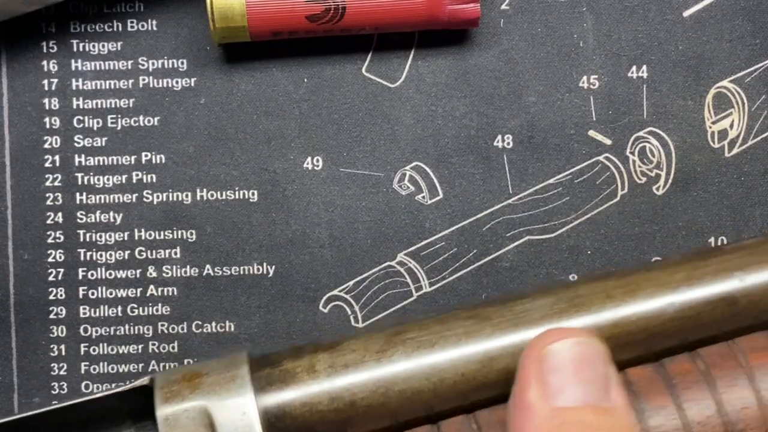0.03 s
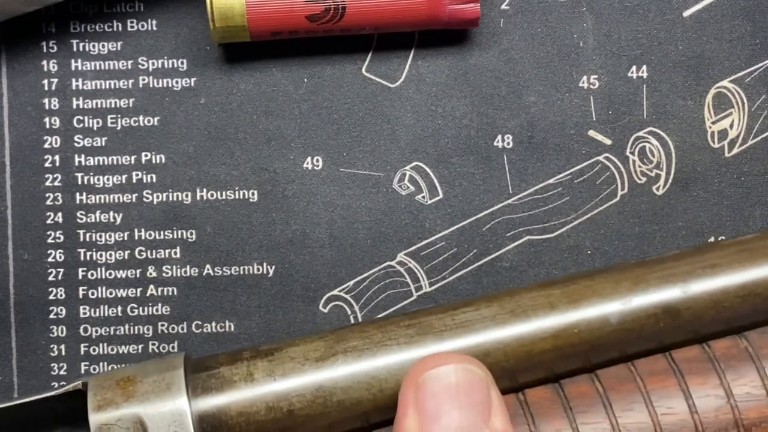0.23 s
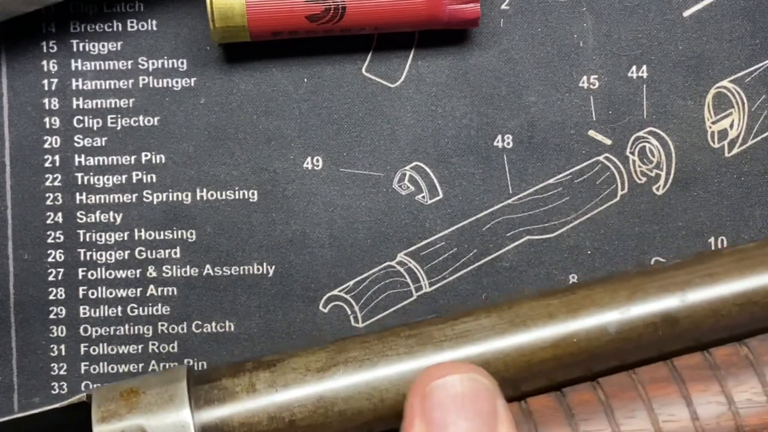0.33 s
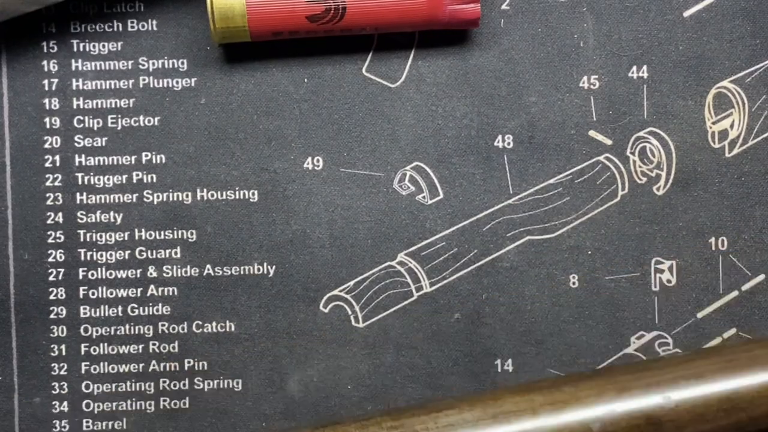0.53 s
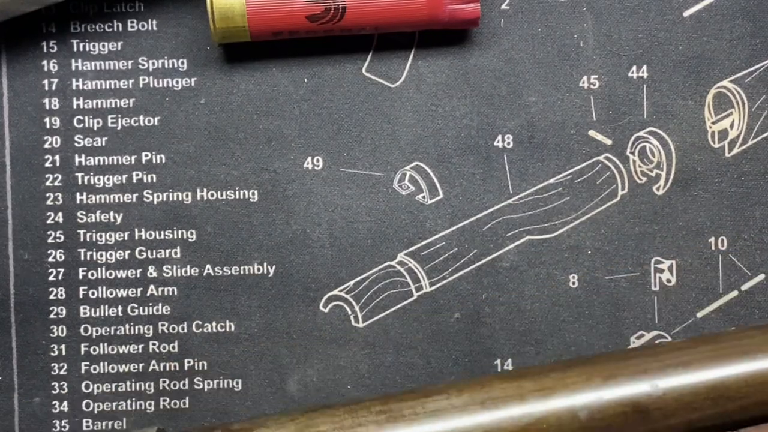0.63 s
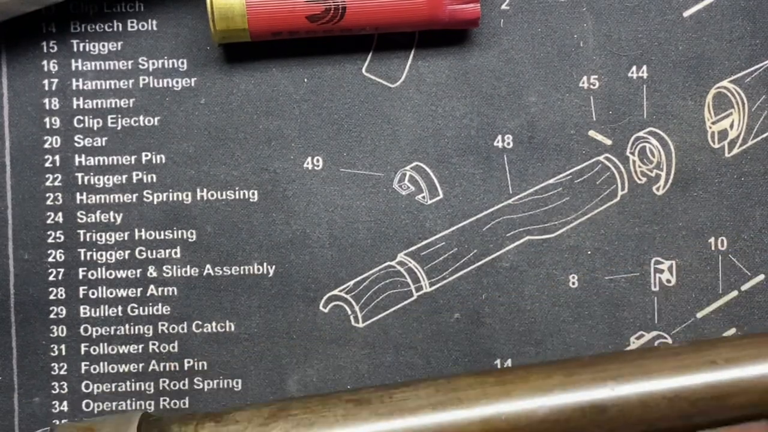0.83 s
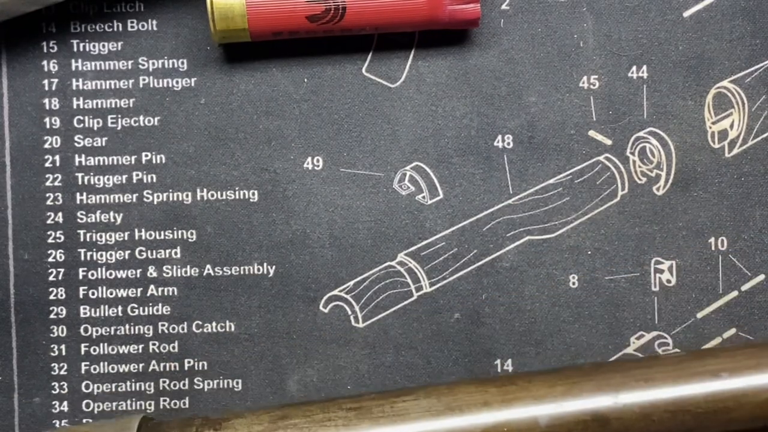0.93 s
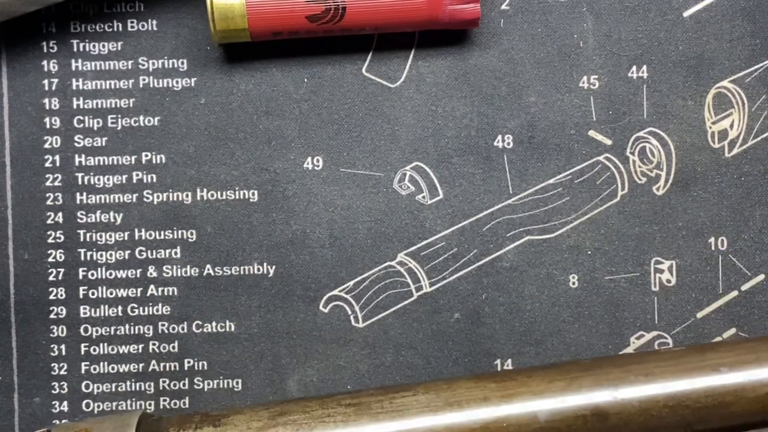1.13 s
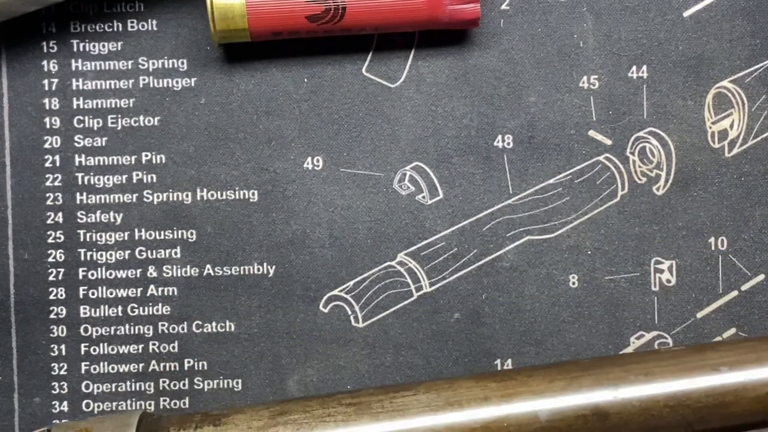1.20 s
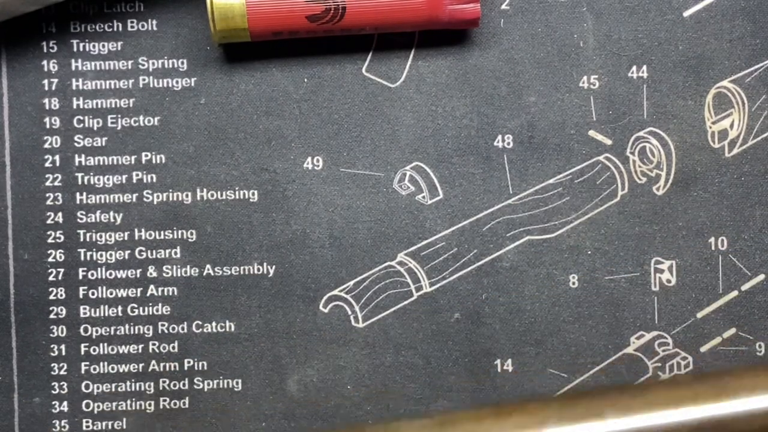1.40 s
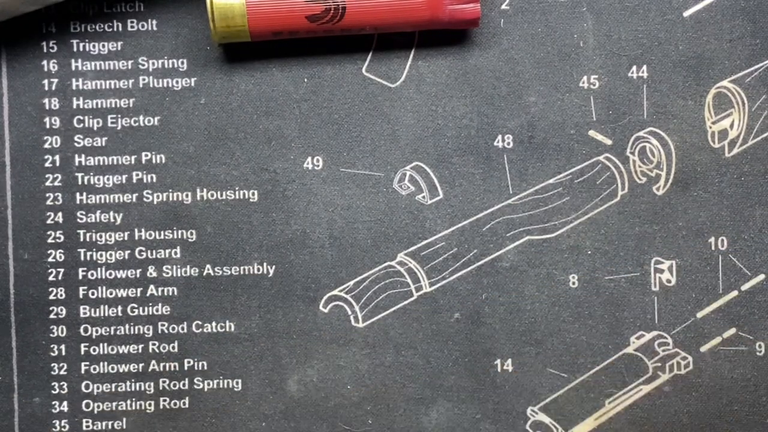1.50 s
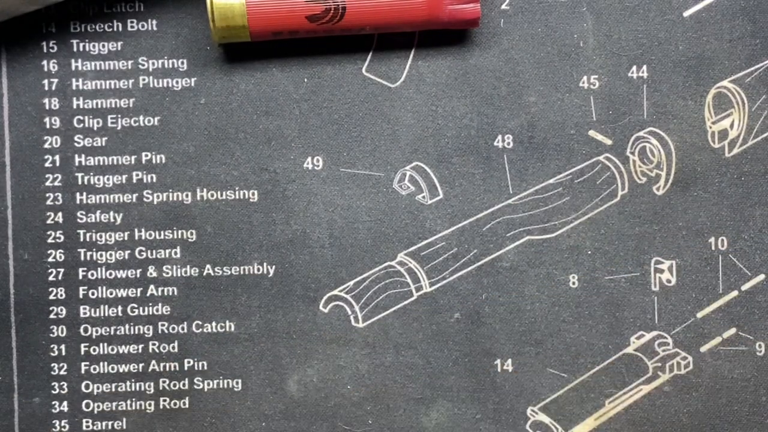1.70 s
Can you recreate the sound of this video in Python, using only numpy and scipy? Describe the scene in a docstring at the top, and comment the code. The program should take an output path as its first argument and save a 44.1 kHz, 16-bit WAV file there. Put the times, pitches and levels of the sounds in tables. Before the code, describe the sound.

Close to the microphone in a small room, a heavy gun's metal parts clack in two quick clusters as it is lifted. The padded bench thumps, then booms softly while hands faintly rub and tick on the gun.

```python
"""A heavy steel shotgun is picked up from a padded workbench, close to the microphone, in a small room.
At first it rings faintly from an earlier touch. Its parts clack near 0.11 s and again near 0.4 s,
each time in a quick run of metal contacts that scrape, clank and ring the steel. The second run ends
in a dull thump through the bench at 0.48 s. Then the bench booms softly as the weight shifts,
and hands rub and tick on the gun over a faint hiss, rumble and hum."""
import sys
import numpy as np
from scipy import signal
from scipy.fft import rfft, irfft
from scipy.io import wavfile

SR = 44100
rng = np.random.default_rng(int(sys.argv[2]) if len(sys.argv) > 2 else 0)


def output_pcm(signal):
    """Save a mono or channel-first signal as 16-bit PCM at the path in sys.argv[1].

    Samples are clipped to [-1, 1] before scaling.
    """
    pcm = np.clip(np.atleast_2d(signal).T, -1, 1) * 32767
    wavfile.write(sys.argv[1], SR, np.round(pcm).astype(np.int16))


N = 77175
T = np.arange(N) / SR
FREQS = np.maximum(np.arange(N + 1) * SR / (2 * N), 1)
ATTACK_S = 0.00017

# steel-on-steel noise spectrum: freq_hz, gain_db
STEEL_SPECTRUM = [(100, -20.5), (350, -13), (600, -7), (900, -1.5), (1200, -1.5), (2000, 6.5), (2900, 0.5),
                  (5000, 1), (7500, -1.5), (9000, -3.5), (12000, -13.5), (13600, -11.5), (15200, -6),
                  (16000, -17)]


def undb(db):
    """Decibels to gain."""
    return 10 ** (np.asarray(db) / 20)


def over_hz(points, hz=FREQS):
    """Interpolate (freq_hz, value) rows on a log axis."""
    table = np.array(points, float)
    return np.interp(np.log(hz), np.log(table[:, 0]), table[:, 1])


def envelope(points, column):
    """Gain over time from (time_s, level_db, ...) rows."""
    table = np.array(points, float)
    return undb(np.interp(T, table[:, 0], table[:, column]))


def burst(start_s, rise_s, hold_s, fall_s):
    """Attack, hold, exponential release."""
    age_s = np.maximum(T - start_s, 0)
    return (1 - np.exp(-age_s / rise_s)) * np.exp(-np.maximum(age_s - hold_s, 0) / fall_s)


def resonance(hz, width_hz):
    """Squared magnitude of one resonance."""
    return 1 / (1 + ((FREQS / hz - hz / FREQS) * hz / width_hz) ** 2)


def lowpass(cutoff_hz):
    """Fourth-order low-pass gain."""
    return 1 / (1 + (FREQS / cutoff_hz) ** 4)


def shape(x, gain):
    """Filter by a gain per frequency."""
    return irfft(rfft(x, 2 * N) * gain)[..., :N]


def convolve(x, response):
    """Filter by an impulse response."""
    return shape(x, rfft(response, 2 * N))


def noise(gain):
    """Coloured noise, rms 1."""
    x = shape(rng.standard_normal(N), gain)
    return x / x.std()


def stereo_noise(gain, side):
    """Coloured mid noise plus a share of side noise."""
    return noise(gain) + side * noise(gain) * np.array([[1], [-1]])


def rumble():
    """Low noise that sinks after the thump and returns."""
    # freq_hz, gain_db
    spectrum = [(20, -23), (40, -0.5), (68, -2), (100, -2.5), (160, -14), (300, -27), (600, -29.5),
                (1500, -48)]
    # time_s, level_db
    levels = [(0, -50.5), (.4, -53.5), (.56, -63.5), (.7, -71.5), (.85, -50), (1.0, -55), (1.2, -55),
              (1.75, -60)]
    return noise(undb(over_hz(spectrum))) * envelope(levels, column=1)


def hum_and_whine():
    """Faint tone and narrow noise band; both dip after the thump."""
    hum_hz, dip_db, dip_at_s, dip_half_width_s = 312, -30, .66, .11
    hum = undb(-72) * np.sin(2 * np.pi * hum_hz * T)
    whine = undb(-74) * stereo_noise(resonance(hz=1580, width_hz=300), side=.4)
    return (hum + whine) * undb(dip_db * np.exp(-((T - dip_at_s) / dip_half_width_s) ** 2))


def rubbing():
    """Hands rub unevenly on the gun: midrange friction noise and hiss."""
    # freq_hz, gain_db
    rub_spectrum = [(40, -24), (150, -6.5), (320, -1.5), (550, -6.5), (850, -3.5), (1200, -4.5),
                    (1680, 2.5), (2400, -4.5), (3300, -7.5), (4500, -13.5), (7000, -31.5)]
    # freq_hz, gain_db
    hiss_spectrum = [(2000, -24), (3800, -6), (5200, 3.5), (7000, -1.5), (9000, 0), (12000, -4),
                     (15000, -3)]
    # time_s, rub_db, hiss_db
    levels = [(0, -46.5, -59.5), (.065, -53, -63.5), (.27, -65.5, -82.5), (.34, -72.5, -84.5),
              (.6, -84.5, -88), (.68, -88, -84), (.78, -65, -69), (.83, -61.5, -69.5), (.92, -68, -81),
              (1.08, -74.5, -90), (1.2, -73, -75.5), (1.29, -68.5, -83.5), (1.37, -59, -58.5),
              (1.425, -64, -71.5), (1.49, -59.5, -59.5), (1.61, -62.5, -64), (1.69, -59.5, -58),
              (1.75, -62, -58.5)]
    rub = stereo_noise(undb(over_hz(rub_spectrum)), side=.4) * envelope(levels, column=1)
    hiss = stereo_noise(undb(over_hz(hiss_spectrum)), side=.55) * envelope(levels, column=2)
    grip_db = 0.96 * noise(lowpass(cutoff_hz=35))
    return (rub + hiss) * undb(grip_db)


def handling_ticks():
    """Fingers and loose parts touch lightly: band-filtered noise bursts."""
    # start_s, level_db, centre_hz, decay_s
    touches = [(0.774, -57.5, 2580, 0.0051), (0.933, -56.5, 4994, 0.0028), (1.128, -63.5, 4500, .002),
               (1.164, -65.5, 3970, 0.0022), (1.335, -60.5, 6000, 0.0055), (1.348, -55, 7920, 0.0048),
               (1.372, -52.5, 4350, 0.012), (1.377, -39.5, 1130, 0.0023), (1.404, -57, 1400, 0.0032),
               (1.486, -58, 4500, 0.0099)]
    out = np.zeros(N)
    for start_s, level_db, centre_hz, decay_s in touches:
        band = resonance(centre_hz, width_hz=.9 * centre_hz)
        tick = noise(band) * burst(start_s, ATTACK_S, 0, decay_s)
        out += undb(level_db) * shape(tick, np.sqrt(band))
    return out


def fading_ring():
    """The gun rings out from an earlier touch."""
    # centre_hz, width_hz, gain_db
    peaks = [(790, 14, 4), (1570, 84, -1), (2460, 220, -12), (3300, 36, -4.5), (4230, 99, -18.5),
             (4580, 120, -7)]
    decay_s = .065
    spectrum = sum(undb(gain_db) * resonance(hz, width_hz) for hz, width_hz, gain_db in peaks)
    return undb(-47.5) * noise(spectrum) * np.exp(-T / decay_s)


def bench_booms():
    """Shifting weight booms the bench: low tones in Gaussian swells."""
    # peak_s, pitch_hz, level_db, half_width_s
    booms = [(.005, 86.2, -40.5, 0.012), (0.323, 62, -43.5, 0.015), (0.677, 48.5, -42, 0.068),
             (0.832, 45.7, -42.5, 0.031), (.874, 52.8, -27, 0.018), (0.926, 70.3, -39.5, 0.01407),
             (1.077, 46.7, -48, 0.048), (1.32, 68, -49, .02)]
    out = np.zeros(N)
    for peak_s, pitch_hz, level_db, half_width_s in booms:
        swell = np.exp(-((T - peak_s) / half_width_s) ** 2)
        out += undb(level_db) * np.cos(2 * np.pi * pitch_hz * (T - peak_s)) * swell
    return out


def bench_thumps():
    """Highs cross the bench before lows, so each thump falls in pitch."""
    # start_s, level_db
    thumps = [(.482, -19.5), (0.56, -49.5)]
    end_hz, sweep_hz, sweep_s = 41.7, 700, 0.0047
    out = np.zeros(N)
    for start_s, level_db in thumps:
        age_s = np.maximum(T - start_s, 0)
        cycles = end_hz * age_s + sweep_hz * age_s / (1 + age_s / sweep_s)
        pulse = burst(start_s, rise_s=0.00071, hold_s=0.011, fall_s=.013)
        out -= undb(level_db) * np.sin(2 * np.pi * cycles) * pulse
    return out


def stock_knocks():
    """The wooden stock knocks: dull noise bursts."""
    # start_s, level_db, decay_s
    knocks = [(0.115, -31, 0.016), (0.175, -37, .018)]
    # freq_hz, gain_db
    wood_spectrum = [(60, -19), (140, -7.5), (400, -9.5), (800, -0.5), (1150, -5), (3000, -38)]
    force = sum(undb(db) * burst(start_s, ATTACK_S, 0, decay_s) for start_s, db, decay_s in knocks)
    return noise(undb(over_hz(wood_spectrum))) * force


def steel_slides():
    """Friction noise as steel slides between contacts."""
    # start_s, level_db, length_s
    slides = [(0.077, -41, 0.021), (0.134, -41.5, .018), (0.378, -31.5, .06)]
    force = sum(undb(level_db) * burst(start_s, rise_s=.004, hold_s=length_s, fall_s=0.015)
                for start_s, level_db, length_s in slides)
    return noise(undb(over_hz(STEEL_SPECTRUM))) * force


def clinks():
    """Small parts clink and the barrel sounds a hollow note: narrow noise bands."""
    # start_s, pitch_hz, level_db, decay_s
    notes = [(0.367, 2900, -14.5, 0.0033), (.377, 874.8, -25, 0.026), (.3928, 7457, -19, 0.0045),
             (.4195, 13650, -19, .007), (.4225, 7323, -18.5, .005), (.482, 4350, -21.5, .005),
             (.482, 6697, -20, .005), (.497, 4850, -14, 0.0044)]
    out = np.zeros(N)
    for start_s, pitch_hz, level_db, decay_s in notes:
        note = noise(resonance(pitch_hz, width_hz=.07 * pitch_hz))
        out += undb(level_db) * note * burst(start_s, ATTACK_S, 0, decay_s)
    return out


def struck_mode(hz, t60_s):
    """Decaying sine, random phase."""
    return np.sin(2 * np.pi * (hz * T + rng.random())) * burst(0, ATTACK_S, 0, t60_s / np.log(1000))


def gun_clacks():
    """Each contact scrapes and clanks for milliseconds; hands damp it and a light ring stays."""
    # levels relative: start_s, crack_db, scrape_s, treble_db, ring_db, clank_hz
    contacts = [(.0765, -29.5, .002, -1, -32, 1950), (.0858, -29, 0.0012, 5, -29, 1930),
                (0.1032, -23.5, .002, -2.5, -18.5, 1970), (0.1127, -7, 0.0022, -2.5, -8.5, 1825),
                (0.115, -14.5, 0.0046, -5, -12.5, 1960), (.125, -17.5, 0.0056, -13.5, -9, 1900),
                (.131, -24.5, 0.0018, -6, -15.5, 2050), (.139, -38.5, 0.0076, -6.5, -32, 2200),
                (.147, -34, 0.0019, -5.5, -27.5, 2060), (.159, -33.5, 0.0042, -5, -36, 1970),
                (.167, -30.5, .002, -4.5, -17, 2100), (0.1716, -20.5, 0.0079, -3, -22.5, 2192),
                (0.178, -18, 0.0071, -6.5, -18.5, 2055), (0.3618, -30.5, 0.0025, 2.5, -44.5, 2540),
                (0.367, -15.5, .003, 1.5, -7, 2430), (0.37, -15.5, 0.0029, 5.5, -9, 1962),
                (0.3777, -17.5, 0.0021, -1.5, -21.5, 1910), (0.3845, -26, .002, 4, -24.5, 1860),
                (0.392, -19.5, 0.0033, -1, -11, 2000), (0.4008, -26, 0.0025, 1.5, -25.5, 2100),
                (0.4063, -13.5, .002, 2.5, -3.5, 2181), (.4135, -20, 0.0046, 2.5, -29.5, 2150),
                (0.419, -16.5, 0.0024, 10, -17, 2059), (0.422, -15, 0.003, 8, -14, 2170),
                (0.436, -25.5, 0.0023, -3, -16.5, 2070), (0.442, -25.5, .002, 1, -26, 2100),
                (0.4491, -26.5, .004, 7, -23, 2035), (0.4685, -23.5, 0.0035, 6, -17, 2067),
                (.481, -21, 0.005, 12, -32.5, 1901), (0.4866, -26.5, .003, 0, -29, 2000),
                (0.4936, -16.5, 0.0023, -4, -21.5, 1900), (0.4969, -15, 0.0021, 2.5, -23, 1814)]
    # pitch_hz, first_clack_db, second_clack_db
    modes = [(876, -20.5, -27), (1505, -12.5, -22), (1592.4, -14, -20), (1810, -23.5, -24),
             (1833, -16.5, -26.5), (1932, -14, -13.5), (2145, -20.5, -19), (2073, -22, -23.5),
             (2190, -19, -20), (2317, -20, -24), (2630, -19, -20), (3180, -23, -27), (3360, -21, -26),
             (4206, -22.5, -22), (7910, -30.5, -23.5)]
    clack_split_s, clank_hold_s = .3, 0.0015
    body_power, treble_power, clank = np.zeros((3, N))
    blows = np.zeros((2, N))  # one row per clack
    for start_s, crack_db, scrape_s, treble_db, ring_db, clank_hz in contacts:
        force = undb(crack_db) * burst(start_s, ATTACK_S, scrape_s, fall_s=0.0022)
        body_power += force ** 2
        treble_power += (force * undb(treble_db)) ** 2
        gate = burst(start_s, ATTACK_S, scrape_s + clank_hold_s, fall_s=0.0004)
        clank += undb(ring_db) * np.sin(2 * np.pi * clank_hz * (T - start_s)) * gate
        blows[int(start_s > clack_split_s), int(start_s * SR)] += undb(ring_db)
    grit = noise(undb(over_hz(STEEL_SPECTRUM)))
    body = shape(grit, lowpass(cutoff_hz=5840))
    crack = body * np.sqrt(body_power) + (grit - body) * np.sqrt(treble_power)
    responses = sum(undb([[first_db], [second_db]]) * struck_mode(hz, t60_s=.11)
                    for hz, first_db, second_db in modes)
    ring = convolve(blows, responses).sum(axis=0)
    return crack + undb(-3.5) * clank + undb(-2) * ring


def room(x):
    """Direct sound, quick bench reflections, then a short tail whose treble dies first."""
    # freq_hz, gain_db
    tail_spectrum = [(100, -5), (400, 2.5), (750, 8), (1100, -1.5), (1700, 2), (2200, -4), (3000, -2),
                     (5000, -3), (8000, -1.5), (15000, 0)]
    # freq_hz, t60_s
    tail_decay = [(200, .2), (1000, .18), (2000, .19), (5000, .175), (15000, .17)]
    # left-right part of the reflections: freq_hz, gain_db
    side_spectrum = [(100, -25), (750, -9), (1500, 2), (2200, -16.5), (4000, -7.5), (6000, -25),
                     (8500, -12.5), (15000, -15.5)]
    gap_s, early_s = 0.0021, 0.0054
    diffuse = stereo_noise(undb(over_hz(tail_spectrum)), side=.35)
    tail = np.zeros((2, N))
    for octave in range(10):
        centre_hz = SR / 2 ** (octave + 1)
        band = np.maximum(1 - np.abs(np.log2(FREQS / centre_hz)), 0)
        decay_s = over_hz(tail_decay, centre_hz) / np.log(1000)
        tail += shape(diffuse, band) * burst(gap_s, early_s, 0, decay_s)
    tail /= np.linalg.norm(tail[0])
    early = rng.standard_normal((2, N)) * burst(0, ATTACK_S, 0, early_s)
    early_mid, early_side = early / np.linalg.norm(early, axis=1, keepdims=True)
    side = shape(convolve(x, early_side), undb(over_hz(side_spectrum))) * np.array([[1], [-1]])
    return x + side + convolve(x, undb(-11.5) * early_mid + undb(-19.5) * tail)


def scene():
    """Gun sounds through the room; bench, rubbing and background direct."""
    gun = gun_clacks() + clinks() + steel_slides() + stock_knocks() + fading_ring() + handling_ticks()
    return room(gun) + bench_thumps() + bench_booms() + rubbing() + rumble() + hum_and_whine()


def record(dry):
    """Two microphone ports differ in phase and level; peaks are rounded, the top is cut."""
    # left over right: freq_hz, lead_rad
    port_phase = [(20, 1), (120, 0.5), (300, .1), (650, 1.12), (1300, -0.9), (2100, -1), (3200, -0.87),
                  (5200, -0.3), (6800, 0.5), (7900, -1.5), (8500, -2.5), (9300, -5.5), (10400, -6.5),
                  (11900, -9.5), (13900, -14), (15700, -15)]
    # left over right: freq_hz, gain_db
    port_balance = [(60, 0), (350, 2.5), (750, 2.5), (1050, 2), (1400, 1), (2200, -0.5), (4000, 0),
                    (15000, -.5)]
    cutoff_hz = 15900
    half = np.array([[.5], [-.5]])
    ports = shape(dry, np.exp(1j * over_hz(port_phase) * half) * undb(over_hz(port_balance) * half))
    top_cut = signal.ellip(10, .2, 90, cutoff_hz, fs=SR, output="sos")
    return signal.sosfilt(top_cut, np.tanh(ports))


dry = scene()
out = record(dry)
output_pcm(out)
```